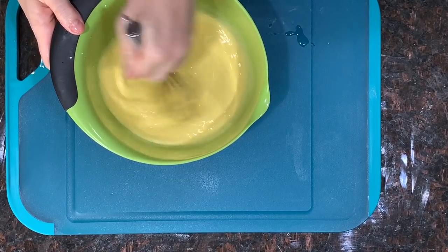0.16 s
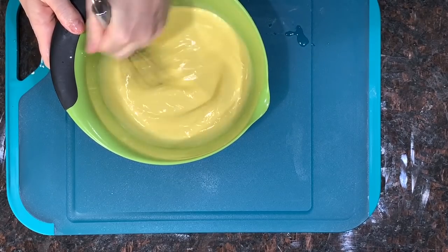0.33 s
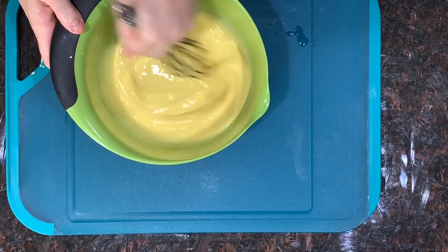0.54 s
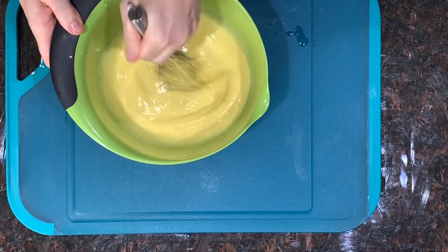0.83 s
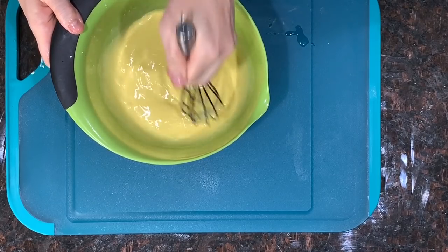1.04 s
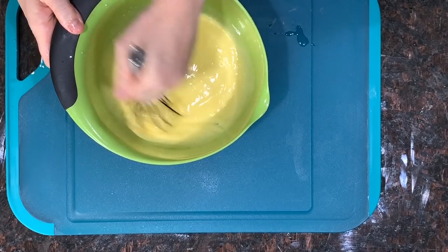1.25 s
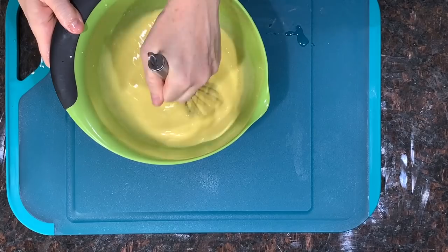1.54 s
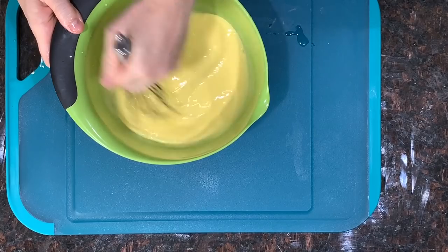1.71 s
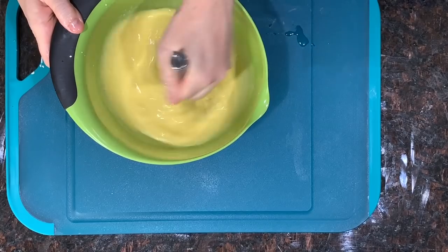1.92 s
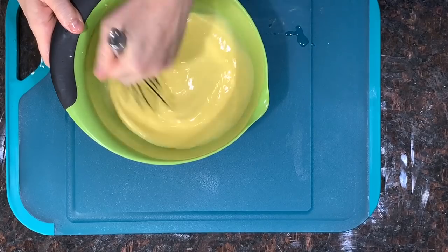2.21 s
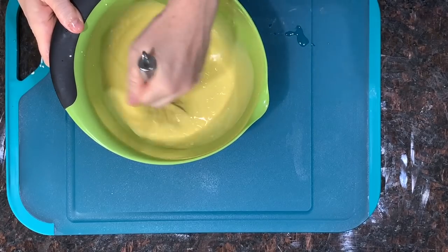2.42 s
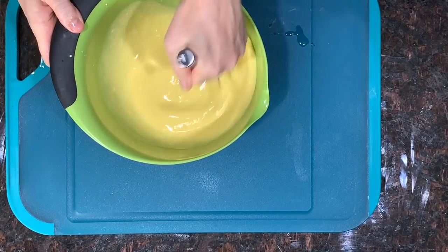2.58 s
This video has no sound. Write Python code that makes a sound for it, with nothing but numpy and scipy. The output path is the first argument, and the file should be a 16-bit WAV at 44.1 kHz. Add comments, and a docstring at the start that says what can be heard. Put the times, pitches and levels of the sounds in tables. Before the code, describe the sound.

A wire whisk beats a thick, creamy mixture in a plastic bowl, with squelches, wet clicks and hollow plops, lighter at first and then harder and denser, heard close in a small quiet kitchen.

```python
"""Whisking a thick egg mixture

A wire whisk beats the mixture in a plastic bowl, close by in a kitchen; later strokes are harder.
Each pass of the wires is a squelch, a swarm of short rising tones; filtered noise bursts make sharp wet clicks.
Damped tones make hollow plops, heavy slaps and dull thuds; softer swarms slosh and random impulses fizz as foam.
The bowl wall and the room add short decaying reflections over a low hum of shaped noise."""
import sys
import numpy as np
from scipy import signal
from scipy.fft import rfft, irfft
from scipy.io import wavfile
from scipy.ndimage import uniform_filter1d

SR = 44100
rng = np.random.default_rng(int(sys.argv[2]) if len(sys.argv) > 2 else 0)


def to_wav(s):
    """Save 16-bit WAV."""
    ch = np.atleast_2d(s).T  # columns
    pcm = np.round(np.clip(ch, -1, 1) * 32767)  # PCM
    wavfile.write(sys.argv[1], SR, pcm.astype(np.int16))


N = 121275  # length in samples


def amp(db):
    """Level: decibels become an amplitude ratio."""
    return 10 ** (np.asarray(db) / 20)


def unit(x):
    """Normalisation: scales a signal to an rms of one."""
    return x / np.sqrt(np.mean(x ** 2) + 1e-20)


def read(points, hz):
    """Spectral interpolation: reads a table along a log-frequency axis."""
    f, value = np.transpose(points)
    return np.interp(np.log(hz + 1), np.log(f + 1), value)


def add(mix, s, sound):
    """Superposition: sums a sound into the mix, starting at s seconds."""
    part = mix[max(round(s * SR), 0):][:len(sound)]
    part += sound[:len(part)]


def colour(x, points, size=2048):
    """Minimum-phase filtering: the phase follows from the (Hz, dB) shape, so the filter is causal."""
    log_gain = np.log(amp(read(points, abs(np.fft.fftfreq(size, 1 / SR)))))
    response = np.exp(np.conj(signal.hilbert(log_gain)))
    taps = np.fft.ifft(response).real
    return signal.fftconvolve(x, taps[:size // 2])[:len(x)]


def noise(points):
    """Stationary random sound: white noise shaped to a (Hz, dB) spectrum, with an rms of one."""
    gain = amp(read(points, np.fft.rfftfreq(N, 1 / SR)))
    return unit(irfft(rfft(rng.standard_normal(N)) * gain, N))


def crackle(n, per_s, spread_db):
    """Shot noise: impulses of random moment and sign, most small and a few large."""
    size = amp(spread_db * np.minimum(rng.exponential(1, n), 4))
    return size * rng.choice([-1, 1], n) * (rng.random(n) < per_s / SR)


def bubble(hz, decay_s, glide):
    """Bubble resonance: an exponentially damped tone whose pitch rises by 2 * glide per decay time."""
    t = np.arange(0, 7 * decay_s, 1 / SR)
    phase = 2 * np.pi * hz * t * (1 + glide * t / decay_s)
    return np.exp(-t / decay_s) * np.sin(phase)


def swarm(lo_hz, hi_hz, per_s, cycles, spread_db):
    """Superposed bubble resonances: many short rings of 24 pitches at random moments, rms one."""
    pitches = np.geomspace(lo_hz, hi_hz, num=24)
    total = np.zeros(N)
    for hz in pitches:
        impulses = crackle(N, per_s / len(pitches), spread_db)
        ring = (hz / hi_hz) ** 0.66 * bubble(hz, cycles / hz, glide=0.036)  # low pitches are weaker
        total += signal.oaconvolve(impulses, ring)[:N]
    return unit(total)


def resonate(x, hz, width_hz):
    """Moving resonance: shifts the pitch curve to zero, low-passes there and shifts back, peak gain one."""
    turn = np.exp(2j * np.pi * np.cumsum(hz) / SR)
    r = np.exp(-np.pi * width_hz / SR)
    return 2 * (turn * signal.lfilter([1 - r], [1, -r], x / turn + 1e-18)).real


def rings(table, cycles):
    """Damped oscillation: each tone swells quickly and decays to 1/e in the given number of cycles."""
    swell = 0.28  # rise time as a share of the decay time
    out = np.zeros(N)
    for s, hz, db in table:
        ring = bubble(hz, cycles / hz, glide=0.0033)
        t = np.arange(len(ring)) / SR
        ring = ring * (1 - np.exp(-t / (swell * cycles / hz)))
        add(out, s, amp(db) * ring / abs(ring).max())
    return out


def reflections(x, t60, level, delay_s, size):
    """Reverberant decay: sparse echoes of random sign, each band dying at its own speed."""
    t, hz = np.arange(size) / SR, np.fft.rfftfreq(size, 1 / SR)
    taps = rng.choice([-1, 1], size) * (rng.random(size) < .1)
    centres, tail = np.geomspace(125, 16000, 8), np.zeros(size)
    for centre, pick in zip(centres, np.eye(len(centres))):
        mask = read(list(zip(centres, pick)), hz)
        decay = np.exp(-np.log(1000) * t / read(t60, centre))
        band = irfft(rfft(taps) * mask, size) * decay
        tail += band * np.sqrt(np.mean(mask ** 2) / np.sum(band ** 2)) * amp(read(level, centre))
    out = np.zeros(len(x))
    add(out, delay_s, signal.fftconvolve(x, tail))
    return out


def hum():
    """Stationary room tone: steady noise with most of its power at low frequencies."""
    # Spectrum of the room tone. Each row: frequency in Hz, relative density in dB per Hz.
    hum_shape = [(20, -11), (42, -1), (53, -0.5), (80, -13.5), (500, -21), (5000, -46.5), (16000, -49)]
    return amp(-57) * noise(hum_shape)


def room_echo(x):
    """Room reverberation: delayed reflections from the kitchen, with a decay for each band."""
    # Decay of the room. Each row: frequency in Hz, time to fall by 60 dB in seconds.
    room_t60 = [(300, 0.13), (8000, 0.24)]
    # Strength of the room's reflections. Each row: frequency in Hz, level in dB.
    room_level = [(300, -17.5), (8000, -13.5)]
    return reflections(x, room_t60, room_level, delay_s=.005, size=16384)


def bowl_echo(x):
    """Early reflection: the nearby bowl wall returns short echoes after about a millisecond."""
    # Decay in the bowl. Each row: frequency in Hz, time to fall by 60 dB in seconds.
    bowl_t60 = [(500, 0.051), (8000, 0.038)]
    # Strength of the wall's reflections. Each row: frequency in Hz, level in dB.
    bowl_level = [(150, -15.5), (900, 1.5), (9000, -5.5)]
    return reflections(x, bowl_t60, bowl_level, delay_s=0.001215, size=4096)


def foam(stirring):
    """Relaxation: fine bubbles burst at a level that follows the stirring power and then fades."""
    # Spectrum of the bursting foam. Each row: frequency in Hz, relative level in dB.
    foam_shape = [(300, -18), (3200, -24), (7500, 11), (15000, -5.5)]
    fade_s = 0.11  # decay time of the stirring power
    keep = np.exp(-1 / (fade_s * SR))
    activity = np.sqrt(signal.lfilter([1 - keep], [1, -keep], stirring ** 2))
    fizz = unit(colour(crackle(N, per_s=10000, spread_db=10), foam_shape))
    return amp(-18) * activity * fizz


def slosh():
    """Low bubble resonance: the mass of liquid swinging round the bowl gurgles with large soft bubbles."""
    # Loudness of the swinging liquid. Each row: time in seconds, level in dB.
    slosh_level = [(0, -60), (.3, -56), (.46, -73), (0.778, -53.5), (.97, -68), (1.28, -53), (1.7, -58.5),
                   (1.8, -58), (2.2, -49), (2.58, -75), (2.75, -60)]
    # Its bubbles. One row: lowest and highest pitch in Hz, rate per second,
    # decay time in cycles, spread of sizes in dB.
    slosh_bubbles = (106, 669, 240, 1.47, 1.3)
    level_db = np.interp(np.arange(N) / SR, *np.transpose(slosh_level))
    return amp(level_db) * swarm(*slosh_bubbles)


def thuds():
    """Damped low mode: the bowl rocks on its board with a dull thud."""
    # Each row: start in seconds, pitch in Hz, dry peak level in dB.
    thud_table = [(2.22, 66, -42), (2.72, 172, -37)]
    return rings(thud_table, cycles=1.58)


def plops():
    """Cavity resonance: trapped air pockets ring as hollow plops."""
    # Each row: start in seconds, pitch in Hz, dry peak level in dB.
    plop_table = [(.119, 472, -45), (.136, 1183, -34), (.5085, 706, -25.5), (.679, 1270, -31.5),
                  (.701, 285.5, -41), (.899, 1185, -34.5), (1.34, 2080, -29.5), (1.345, 254, -44.5),
                  (1.818, 454, -33), (2.139, 248.7, -36.5), (2.258, 447, -34.5), (2.552, 1850, -25),
                  (2.577, 2000, -25.5), (2.6353, 1876, -25)]
    return rings(plop_table, cycles=3.9)


def slaps():
    """Heavily damped impulse: falling mixture pushes the air once and the bowl wall throws it back."""
    # Each row: start in seconds, pitch in Hz, dry peak level in dB.
    slap_table = [(.3412, 520, -22.5), (.7452, 675, -27), (2.0331, 524, -25), (2.3218, 515, -27.5),
                  (2.4112, 363, -47), (2.4675, 420, -28.5), (2.6524, 560, -20), (2.6652, 486, -23)]
    push = rings(slap_table, cycles=0.49)
    return push + amp(-5) * bowl_echo(push)


def clicks():
    """Impulsive rupture: a sticky film crackles faintly, snaps and sprays, echoed anew by the bowl."""
    # Wires clicking in the mixture. Each row: snap time in seconds, then the
    # mid, upper mid and treble spectral levels in dB.
    click_table = [(0.0434, -12.5, -19, -16.5), (0.137, -12.5, -16.5, -8.5), (0.1682, -15, -12.5, -14.5),
                   (0.2698, -11, -15.5, -4), (0.2966, -1, -2, -7), (0.322, -18, -28, -14.5),
                   (0.3997, -25, -24, -23.5), (0.4902, -16.5, -9.5, -14.5), (0.6458, -15.5, -25, -21),
                   (0.6798, -6.5, -25, -36), (0.6846, -40, -10.5, -19.5), (0.702, -6.5, -14, -15.5),
                   (0.7457, -3.5, -13.5, -11.5), (0.81, -26, -13, -11.5), (0.885, -22, -8.5, -21),
                   (0.8977, -11, -5.5, -9), (1.0799, -21, -20.5, -13.5), (1.1133, -9, -16, -18),
                   (1.2073, -5, -11, -16.5), (1.3231, -8, -17, -23), (1.3389, -12, -25, -27),
                   (1.435, -13.5, -13, -11), (1.4685, -16.5, -32, -16), (1.4841, -7, -10, -11.5),
                   (1.5347, -12, -20, -11.5), (1.6269, -15.5, -10, -20.5), (1.767, -18, -29, -14.5),
                   (1.7836, -28, -9, -6), (1.82, -3, -7.5, -34), (1.8528, -7.5, -5, -20),
                   (1.911, -2, -19.5, -13), (1.9624, -4, -4.5, -6), (1.9815, -1.5, 3.5, -13),
                   (2.0403, -1.5, -5.5, -4), (2.0759, -4, -7, -12), (2.0906, -3, 0.5, -10),
                   (2.1105, -4.5, -27, 1.5), (2.1562, -6.5, -5, -7.5), (2.2143, -7.5, -0.5, -9.5),
                   (2.2561, -2, 4, -2), (2.2585, -0.5, -12, -10), (2.3231, 1.5, -4, -9),
                   (2.411, -0.5, -13.5, -10.5), (2.479, -35, 5.5, -1.5), (2.4966, 1.5, -26, -2),
                   (2.5523, -4, 1.5, -2.5), (2.5776, -7, -17, -11), (2.5844, -6, -23, 2),
                   (2.6373, -10, -6, -17), (2.642, 0.5, -7, -3), (2.6654, -3.5, -13.5, 1.5),
                   (2.7071, -12, -1, -16), (2.714, -2, -5, -8.5)]
    # Frequencies in Hz where those three levels apply.
    click_hz = [2190, 3960, 9600]
    # Lower part of the spectrum. Each row: frequency in Hz, level in dB relative to the mid level.
    click_bass = [(80, -5), (250, -0.5), (700, -1)]
    lead, lead_s = 0.031, 0.0094  # gain and growth time of the crackle before the snap
    snap_s = .0004  # decay time
    spray, spray_s = 0.089, 0.00059  # gain and decay time of the finer spray
    size, early = 4096, 600  # samples in a click, and samples before its snap
    t = (np.arange(size) - early) / SR
    before = lead * np.exp(-abs(t) / lead_s)
    after = np.exp(-abs(t) / snap_s) + spray * np.exp(-abs(t) / spray_s)
    envelope = np.where(t < 0, before, after)
    out = np.zeros(N)
    for s, *levels in click_table:
        spectrum = rfft(rng.standard_normal(size) * envelope)
        broad_power = uniform_filter1d(abs(spectrum) ** 2, size=201)
        burst = irfft(spectrum / np.sqrt(broad_power))  # evens out the broad colour
        bass = [(hz, levels[0] + db) for hz, db in click_bass]
        click = colour(burst, bass + list(zip(click_hz, levels)))
        add(out, s - early / SR, click + bowl_echo(click))
    return out


def furrow(x, progress):
    """Closing cavity: the furrow behind the wires narrows during a pass, so its resonance climbs."""
    climb = 0.71 * (progress - .5)  # octaves
    scatter = 0.29 * rng.uniform(-1.1, 1)  # octaves, one draw per pass
    return amp(-2) * resonate(x, 1825 * 2 ** (climb + scatter), width_hz=870)


def squelches():
    """Bubble entrainment: wires tear the liquid into bubbles of three sizes that swell with every pass."""
    # Passes of the wires. Each row: start in seconds, length in seconds, then the
    # low, mid and treble levels in dB.
    pass_table = [(0.028, 0.021, -46.5, -58, -83), (0.128, 0.069, -62, -54, -75),
                  (0.218, 0.031, -58, -50, -55.5), (0.27, 0.06, -41, -48, -48),
                  (0.434, 0.027, -59, -51, -50), (0.509, 0.032, -50, -48, -56.5),
                  (0.581, 0.027, -82, -56.5, -49.5), (0.819, 0.029, -45.5, -48, -48.5),
                  (0.88, 0.042, -50.5, -46.5, -47.5), (1.024, 0.0054, -50.5, -49.5, -48),
                  (1.056, 0.081, -56.5, -50, -53.5), (1.225, 0.051, -50.5, -55, -53.5),
                  (1.326, 0.025, -52.5, -43.5, -45), (1.366, 0.051, -56, -55.5, -48.5),
                  (1.538, 0.045, -46, -48.5, -50.5), (1.595, 0.076, -54, -68, -69),
                  (1.762, 0.055, -43, -44.5, -43.5), (1.821, 0.168, -57, -52.5, -57),
                  (1.965, 0.044, -37.5, -37.5, -36), (2.005, 0.068, -45, -45, -41.5),
                  (2.084, 0.047, -64, -42, -38), (2.129, 0.062, -49.5, -44, -46.5),
                  (2.378, 0.046, -40.5, -44.5, -53.5), (2.429, 0.087, -48.5, -38.5, -38.5),
                  (2.511, 0.092, -72, -45.5, -48), (2.613, 0.069, -69, -46, -42.5)]
    # Bubble sizes, low to treble. Each row: lowest and highest pitch in Hz, rate per second,
    # decay time in cycles, spread of sizes in dB.
    bubble_sizes = [(322, 1154, 800, 2, 3.5), (1075, 3740, 2400, 2.9, 4.5), (3660, 17500, 5000, 2.15, 5.5)]
    rise_s, fall_s = 0.016, 0.004
    out, t = np.zeros(N), np.arange(N) / SR
    # the wires catch and slip: rms unevenness of 1.03 dB
    lumps = amp(1.03 * noise([(10, -20), (40, 0), (150, 0), (400, -40)]))
    for k, bubbles in enumerate(bubble_sizes):
        fizz = swarm(*bubbles) * lumps
        for start, length, *levels in pass_table:
            rise = np.clip((t - start) / rise_s + .5, 0, 1)
            fall = np.exp(-np.maximum(t - start - length + fall_s, 0) / fall_s)
            part = fizz * rise * fall
            if k == 1:  # the middle sizes ring in the furrow
                part = part + furrow(part, progress=np.clip((t - start) / length, 0, 1))
            # equal energy per unit of length, before the level
            part = part * np.sqrt(length * SR / (np.sum(part ** 2) + 1e-12))
            out += amp(levels[k]) * part
    return out


def scene():
    """Superposition of sources: the whisking in its bowl, then the kitchen around it."""
    tearing = squelches()
    bowl = foam(tearing) + slosh() + thuds() + plops() + slaps() + clicks() + tearing
    return (bowl + room_echo(bowl) + hum())[None]


def record(dry):
    """Linear filtering: the microphone's colour, then a band limit at 16.5 kHz."""
    # Response of the microphone. Each row: frequency in Hz, gain in dB.
    mic_response = [(1000, 0), (6000, 3.5), (8300, 5), (9400, 0), (10800, -7), (13500, -5.5),
                    (15500, -14.5), (16500, -46)]
    low_pass = signal.firwin(255, 16500, window=("kaiser", 9), fs=SR)
    return signal.fftconvolve(colour(dry[0], mic_response), low_pass, "same")[None]


dry = scene()
out = record(dry)
to_wav(out)
```